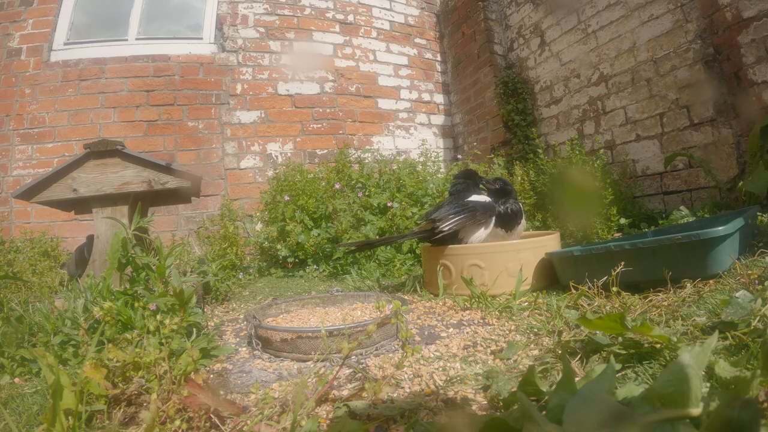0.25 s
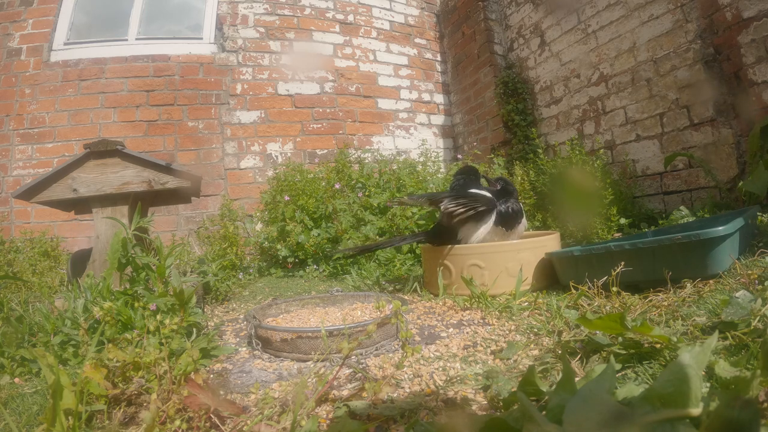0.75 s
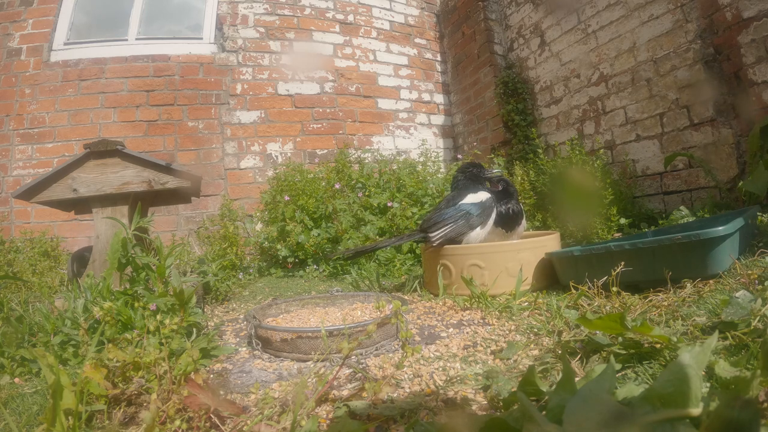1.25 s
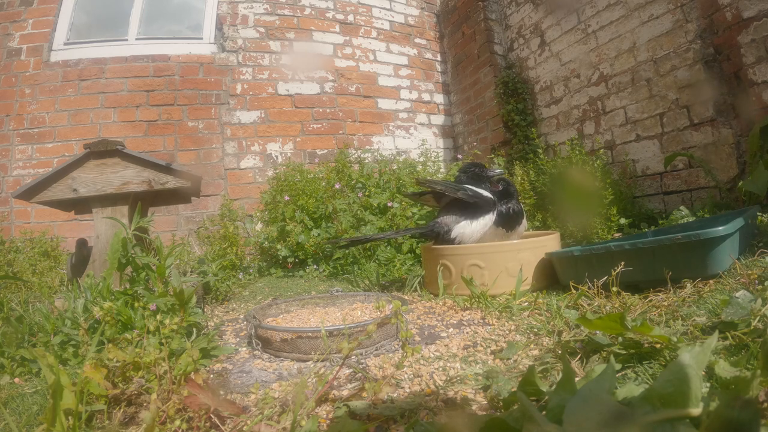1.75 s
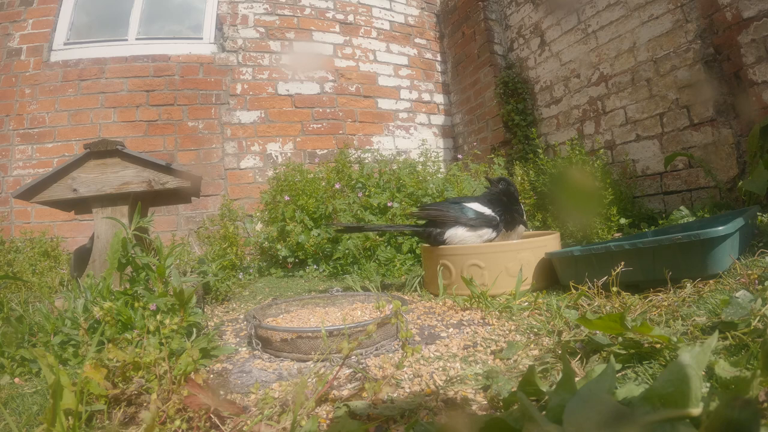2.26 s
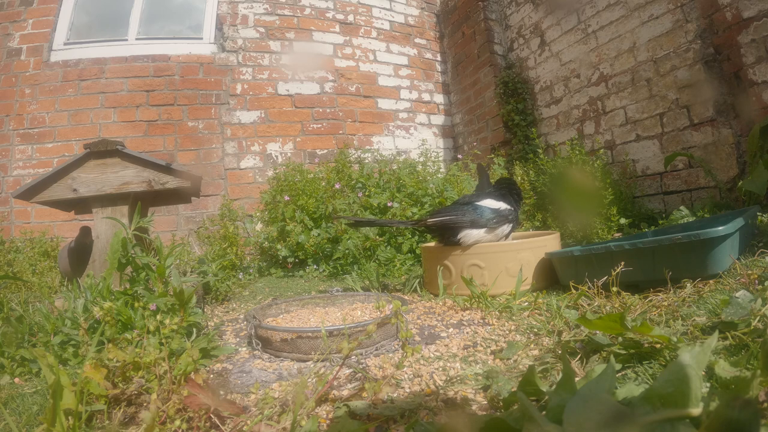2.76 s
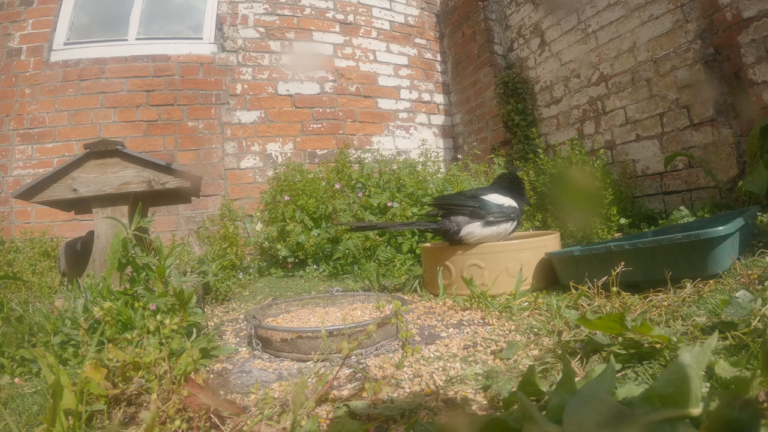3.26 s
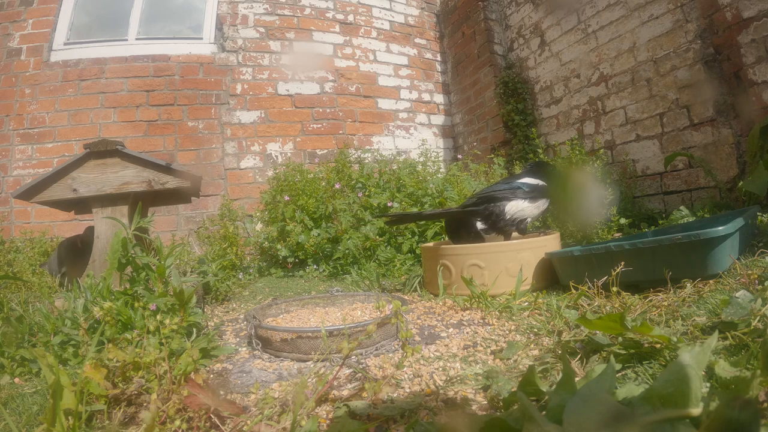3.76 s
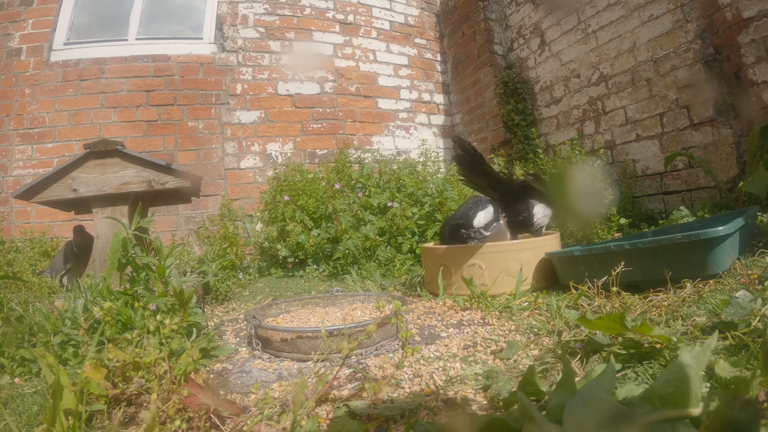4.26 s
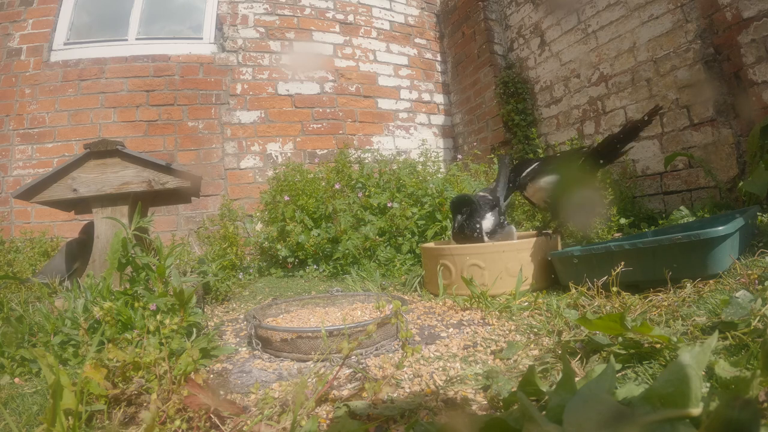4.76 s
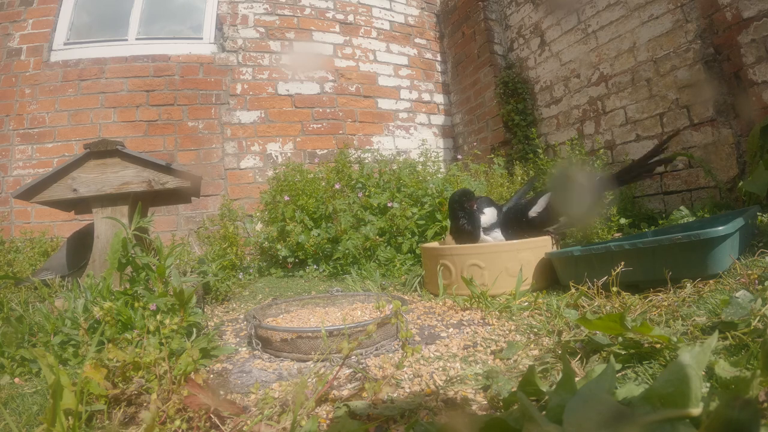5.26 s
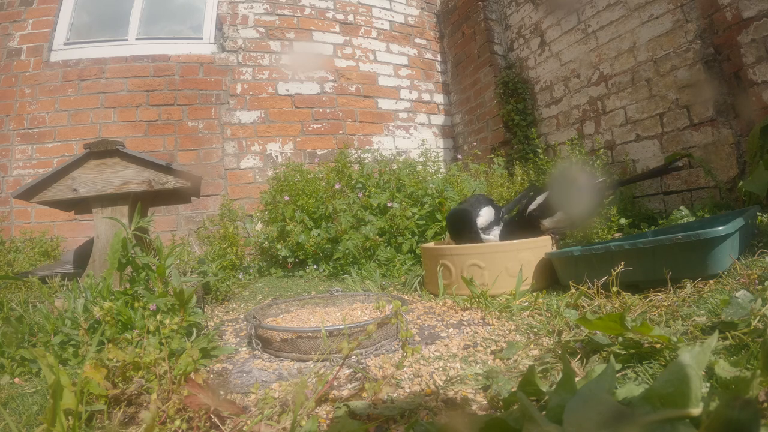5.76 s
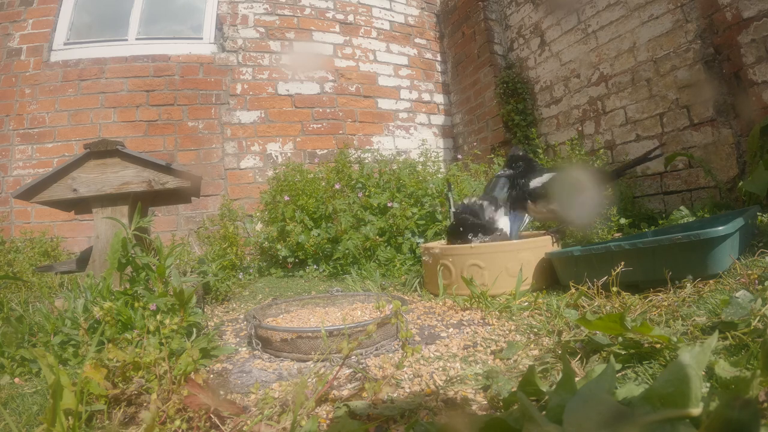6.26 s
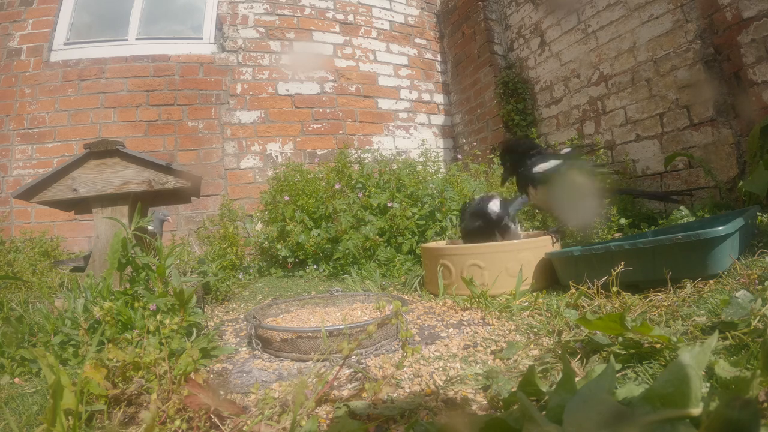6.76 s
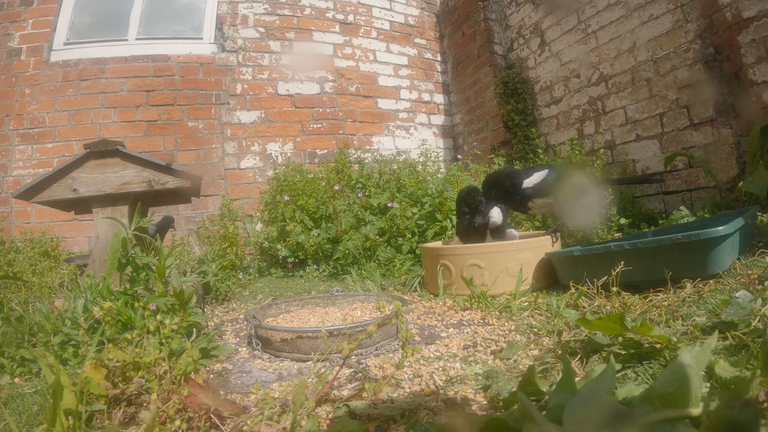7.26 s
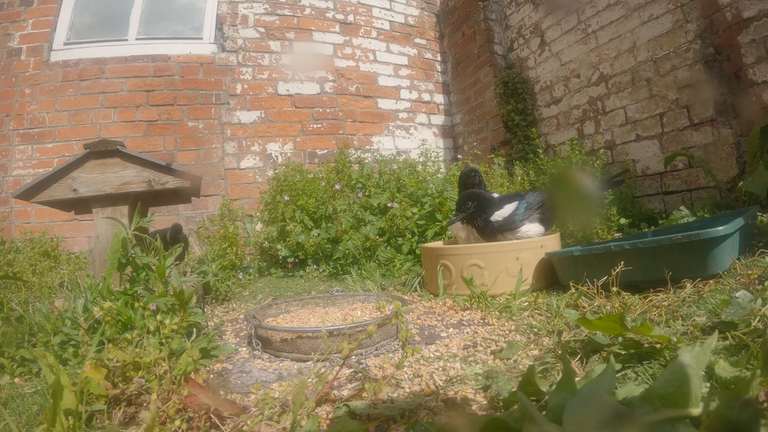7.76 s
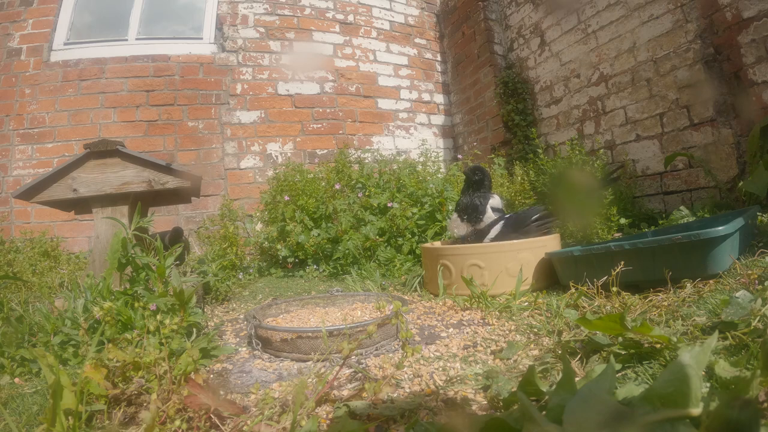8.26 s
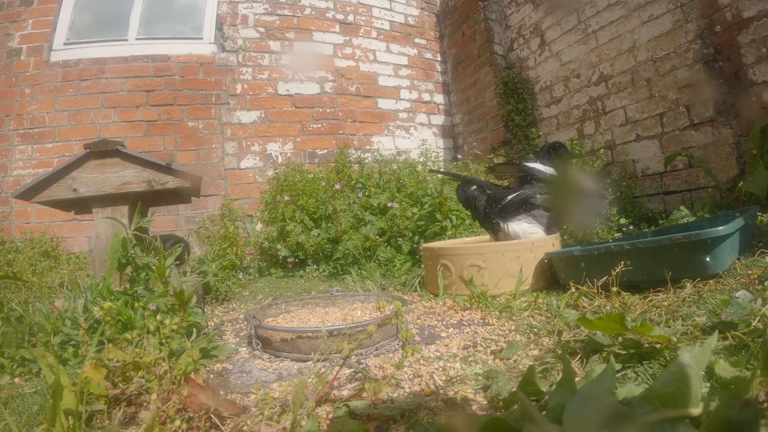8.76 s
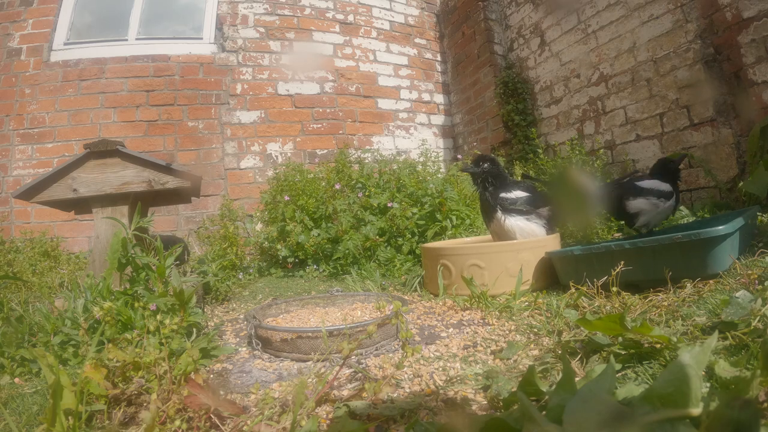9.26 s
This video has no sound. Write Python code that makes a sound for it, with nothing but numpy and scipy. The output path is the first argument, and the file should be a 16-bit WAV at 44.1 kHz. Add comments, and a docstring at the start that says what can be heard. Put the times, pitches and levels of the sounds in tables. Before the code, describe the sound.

Raspy chattering bird calls, bursts of wing-slapped water with gulps and drips, over a distant engine throb that fades and later swells in a walled garden.

```python
"""Young magpie bathing and begging

In a walled garden a young magpie bathes in a glazed dish and begs six times: trills of voiced beats.
Its wings slap the water: noise bursts and bubble showers make the spray and slosh, air pockets gulp
as rising tones, the dish rings in four modes and drops patter on the plants. Brick walls answer.
A far engine, a throb with blurred orders and roar, fades behind the house and swells again;
the garden hisses and one deep rumble comes and goes."""
import sys
import numpy as np
from scipy import signal
from scipy.fft import rfft, irfft, next_fast_len
from scipy.io import wavfile
from scipy.ndimage import uniform_filter1d, map_coordinates

SR = 44100
rng = np.random.default_rng(int(sys.argv[2]) if len(sys.argv) > 2 else 0)


def dump(signal):
    """Clip the signal to [-1, 1] and save it as 16-bit WAV at the path in sys.argv[1]."""
    limited = np.clip(np.atleast_2d(signal).T, -1, 1)
    pcm = np.round(limited * 32767).astype(np.int16)
    wavfile.write(sys.argv[1], SR, pcm)


N = 419832
TOP_HZ = 15800  # upper band limit at the microphone


def amp(db):
    """Decibels to gain."""
    return 10 ** (np.asarray(db) / 20)


def unit(x):
    """x at rms 1."""
    return x / np.sqrt(np.mean(x ** 2) + 1e-20)


def along(points, hz):
    """Read (Hz, value) points on a log frequency axis."""
    f, v = np.transpose(points)
    return np.interp(np.log(hz + 1), np.log(f + 1), v)


def curves(rows, t):
    """Each column after the time, at times t."""
    s, *cols = np.transpose(rows)
    return [np.interp(t, s, c) for c in cols]


def wobble(rate, size=N):
    """A smooth random curve, rate knots a second."""
    knots = rng.standard_normal(int(size * rate / SR) + 4)
    return map_coordinates(knots, [np.arange(size) * rate / SR])


def add(track, s, x):
    """Mix x into track from time s."""
    i = max(0, round(s * SR))
    track[i:i + len(x)] += x[:max(0, len(track) - i)]


def filtered(x, response):
    """x times a complex response of frequency."""
    n = x.shape[-1]
    m = next_fast_len(n + SR // 4)
    return irfft(rfft(x, m) * response(np.fft.rfftfreq(m, 1 / SR)), m)[..., :n]


def coloured(x, spectrum, size=1024):
    """Causal minimum-phase filter of energy 1 with the shape of the spectrum."""
    cepstrum = irfft(np.log(amp(along(spectrum, np.fft.rfftfreq(size, 1 / SR)))))
    cepstrum[1:size // 2] *= 2  # folding the cepstrum makes it causal
    cepstrum[size // 2 + 1:] = 0
    pulse = irfft(np.exp(rfft(cepstrum)))
    return signal.fftconvolve(x, pulse / np.linalg.norm(pulse))[:N]


# How alike diffuse sound is at the left and right microphones.
# Each row: frequency in Hz, left-right correlation (1 = identical).
STEREO_LIKENESS = [(100, 0.99), (490, 0.87), (1500, 0.06), (6000, 0.96), (12000, 0.51)]


def diffuse(gain, size=N):
    """Stereo noise of rms 1 arriving from all around."""
    turn = lambda hz: np.arccos(np.clip(along(STEREO_LIKENESS, hz), -1, 1)) / 2
    shares = lambda hz: np.array([np.cos(turn(hz)), np.sin(turn(hz))])
    mid, side = filtered(rng.standard_normal((2, size)), lambda hz: gain(hz) * shares(hz))
    return unit(np.array([mid + side, mid - side]))


# The six begging calls from the dish.
# Each row: first beat in seconds, last beat in seconds, beats between, open beak's resonance in Hz,
# its height in dB, low rattle in dB relative to the voice, extra level sent to the walls in dB.
BEGGING_CALLS = [(0.01, 0.267, 10, 5300, 0, -26.5, -1.5), (0.488, 1.318, 32, 5000, 1.5, -33, 1.5),
                 (1.706, 1.945, 9, 5940, 2.5, -18, 2.5), (2.46, 3.399, 35, 6980, 4.5, -11.5, 6.5),
                 (5.248, 5.598, 14, 5700, 7, -30, 3.5), (7.631, 7.969, 13, 5450, -2, -16.5, 5)]
# The course of each call, one list a call, before the closing slur.
# Each row: time in seconds, crest pitch in Hz, trough pitch in Hz, voiced share of a beat, level in dB.
CALL_COURSES = [
    [(.01, 2850, 1957, 0.73, -34.5), (.11, 2876, 2620, 0.53, -34.5), (.215, 2880, 2400, 0.68, -35),
     (.248, 2210, 2114, 1, -32), (.275, 1850, 1760, 0.48, -41.5)],
    [(.49, 3216, 2873, 0.94, -51), (.685, 3086, 2540, 0.54, -40.5), (.735, 3050, 2080, 0.7, -35),
     (.82, 2720, 1660, 0.54, -37.5), (.88, 2236, 1730, 1, -37.5), (.92, 2623, 1830, 0.54, -43),
     (1.07, 2920, 2507, 0.47, -41.5), (1.27, 2780, 2415, 0.62, -39), (1.32, 2144, 2010, 0.84, -38.5)],
    [(1.708, 2746, 2196, 0.38, -53), (1.785, 2735, 1890, 0.51, -40), (1.945, 2067, 1608, 0.95, -40.5)],
    [(2.46, 3010, 2566, 0.47, -47.5), (2.62, 2823, 1920, 0.47, -41), (2.76, 2220, 1820, 0.87, -38.5),
     (2.9, 2770, 2136, 0.85, -41.5), (3.03, 2916, 2450, 0.62, -43), (3.08, 2940, 1898, 0.85, -40.5),
     (3.35, 2887, 1877, 0.95, -40), (3.405, 2670, 1750, 0.68, -38)],
    [(5.249, 3270, 3250, 0.56, -32), (5.32, 3043, 2200, 0.46, -26), (5.39, 2997, 1868, 0.84, -24.5),
     (5.56, 2850, 1514, 0.99, -27.5), (5.612, 1975, 1462, 1, -32)],
    [(7.633, 2854, 2330, 0.53, -43.5), (7.74, 2616, 1750, 0.64, -41.5), (7.81, 1892, 1395, 0.58, -47),
     (7.92, 2500, 1640, 0.65, -40.5), (7.97, 2216, 1716, 0.54, -39.5)],
]


def magpie(lead_s=0.0089):
    """All the begging calls, as they reach the microphones and as they reach the walls."""
    direct, sent = np.zeros((2, N))
    for call_row, course in zip(BEGGING_CALLS, CALL_COURSES):
        first, last, count, gape_hz, gape_db, rattle_db, sent_db = call_row
        t = np.arange(first - lead_s, last + SLUR_S, 1 / SR)
        call = begging(t, trill(t, first, last, count, course), gape_hz, gape_db, rattle_db)
        add(direct, t[0], call)
        add(sent, t[0], amp(sent_db) * call)
    return direct, sent


# The trill's extra speed at first, its settling time, and how its pace follows pitch.
HURRY, SETTLE_S, PACE_POWER = .1, 0.174, 0.115
# The closing slur: length, fall, how late it falls, loss of level by its end.
SLUR_S, SLUR_OCTAVES, SLUR_BEND, SLUR_FADE_DB = .062, 1.5, 1.7, 10


def trill(t, first, last, count, course):
    """Beats start fast, settle and drag at low pitch; the last is drawn out into a falling slur."""
    crest_hz, trough_hz, voiced, level_db = curves(course, t)
    pace = (1 + HURRY * np.exp((first - t) / SETTLE_S)) * crest_hz ** PACE_POWER
    beats = np.cumsum(pace)
    start, end = np.interp([first, last], t, beats)
    count = round(count)
    beats = count * (beats - start) / (end - start)
    beats = np.where(t < last, beats, count + .5 * np.tanh(2 * (beats - count)))
    slur = np.clip((t - last) / SLUR_S, 0, 1) ** SLUR_BEND
    sink = 2 ** (-SLUR_OCTAVES * slur)
    return beats, crest_hz * sink, trough_hz * sink, voiced, level_db - SLUR_FADE_DB * slur


# Throat and open beak as a resonant tract. Each row: frequency in Hz, relative gain in dB.
BEAK_GAIN = [(700, -7), (1500, 2.5), (2400, -12.5), (3000, 0.5), (4000, 3), (5700, 12.5), (7300, 9.5),
             (8800, -8.5), (10000, -11.5), (11000, -43.5), (15000, -39)]
# Low rattle of the voice. Each row: frequency in Hz, relative level in dB per Hz.
RATTLE_SPECTRUM = [(1100, -23), (1490, 0), (2150, 0.5), (3000, -31.5)]


def begging(t, controls, gape_hz, gape_db, rattle_db, gape_width_hz=1100, jitter=0.024, uneven=0.012,
            slack_db=-24, rasp_db=-19, split_db=-1, thinning_db=-10, fall=0.14, climb=.25, knee=2.6,
            lead=0.089, whistle_hz=2980, whistle_db=-25):
    """One call: at each beat the voice opens, dips in pitch, climbs to a flat crest and shuts."""
    beats, crest_hz, trough_hz, voiced, level_db = controls
    around = lambda centre: (beats - centre + .5) % 1 - .5  # beats from the nearest such moment
    dip_width = np.where(around(0) < 0, fall, climb)
    dip = np.exp(-np.abs(around(0) / dip_width) ** knee)
    strain = dip * np.abs(1 - trough_hz / crest_hz)  # the deeper the dip, the hoarser
    slack = np.exp((t - t[-1]) / 0.017)  # the voice frays and loses its overtones at the end

    pitch = crest_hz + (trough_hz - crest_hz) * dip * (1 + .17 * wobble(40, len(t)))
    fraying = jitter * (.5 + dip + 6 * slack) * wobble(1500, len(t))
    pitch = pitch * (1 + uneven * wobble(45, len(t)) + fraying)
    phase = 2 * np.pi * np.cumsum(pitch) / SR

    def tract_db(hz):
        return along(BEAK_GAIN, hz) + gape_db * np.exp(-((hz - gape_hz) / gape_width_hz) ** 2)

    def partial(k):
        gain = amp(tract_db(k * pitch) + slack_db * slack * np.log2(k))
        return gain * np.sin(k * phase) * (k * pitch < TOP_HZ)

    # partials halfway between the harmonics
    split = amp(split_db) * strain * sum(partial(k + .5) * wobble(300, len(t)) for k in range(2, 5))
    lowest = amp(thinning_db * dip) * partial(0.98)
    voice = unit(lowest + sum(partial(k) for k in range(2, 10)) + split)
    noise = lambda db: unit(filtered(rng.standard_normal(len(t)), lambda hz: amp(db(hz))))
    rattle = amp(rattle_db) * noise(lambda hz: along(RATTLE_SPECTRUM, hz))
    voice = voice + np.sqrt(dip) * (rattle + amp(rasp_db) * noise(tract_db))
    opening = np.exp(-(2 * around(voiced / 2 - lead) / voiced) ** 4)
    voice = voice * opening * amp(2 * wobble(60, len(t)))
    # evened over about a beat, so the course sets the level
    power = np.abs(uniform_filter1d(voice ** 2, size=1150))
    # a thin whistle lingers between beats when the crest is near whistle_hz
    whistle = np.exp(-((crest_hz - whistle_hz) / 130) ** 2 - (around(1 / 2) / climb) ** 2)
    whistle = whistle * np.sin(2 * np.pi * np.cumsum(crest_hz) / SR)
    fade = np.clip(np.minimum(t - t[0], t[-1] - t) / 0.0018, 0, 1)
    return (voice / np.sqrt(power + 1e-9) + amp(whistle_db) * whistle) * fade * amp(level_db)


# Wing strokes in the water; the gulps follow them too.
# Each row: time in seconds, spray in dB, slosh in dB, both before colouring.
WING_STROKES = [(4.092, -45, -65), (4.171, -48, -48), (4.235, -41, -48.5), (4.381, -44, -50),
                (4.453, -39.5, -51), (4.518, -38, -58), (4.587, -40, -40.5), (4.659, -37.5, -42.5),
                (4.743, -36, -41.5), (4.917, -41, -55.5), (6.092, -49.5, -42.5), (6.17, -38.5, -43),
                (6.249, -43, -48.5), (6.312, -39.5, -52), (6.406, -36.5, -45), (6.6, -38.5, -48),
                (6.69, -44, -52), (6.749, -38, -51.5), (6.828, -36.5, -47), (6.903, -41, -40.5),
                (6.982, -42, -53.5), (7.033, -40, -46), (7.518, -43, -53), (7.611, -44, -56),
                (8.326, -41.5, -38.5), (8.46, -39.5, -40), (8.531, -33, -46), (8.597, -34.5, -45),
                (8.668, -35.5, -42.5), (8.74, -39, -51.5), (8.841, -37.5, -34.5), (9.374, -45, -43.5),
                (9.454, -43, -41.5)]
# Heavy drops smacking the water. Each row: time in seconds, relative level in dB.
DROP_SMACKS = [(4.174, -12.5), (4.385, -9.5), (4.545, -12.5), (4.5923, -8.5), (4.6592, -18), (4.747, -11),
               (4.805, -12), (6.317, -14.5), (6.6014, -22), (6.9036, -4.5), (7.5616, -9.5), (8.4637, -12.5),
               (8.61, -5), (8.751, -20), (9.377, -18), (9.459, -20)]
# Colour of the fine spray. Each row: frequency in Hz, relative level in dB per Hz.
SPRAY_SPECTRUM = [(1500, -29.5), (4000, -15), (5600, -6), (7200, -4), (8500, -14.5), (12300, -22.5),
                  (15500, -47)]
# Colour of the heavier slosh. Each row: frequency in Hz, relative level in dB per Hz.
SLOSH_SPECTRUM = [(250, 2.5), (550, -12.5), (1100, -8.5), (2500, -10.5), (7000, -25)]


def splashes(swell_s=0.0004, slap_s=0.0091, spray_s=0.022, slosh_s=0.012, fall_s=0.1,
             smack_db=-3.0, crack_db=19, thud_db=22, ticks_db=-15, laps_db=-18):
    """Strokes slap the surface, throw fine spray and churn larger bubbles; the drops fall back."""
    cracks, thuds, spray, slosh, thrown = np.zeros((5, N))
    t = np.arange(SR // 2) / SR
    swell = 1 - np.exp(-t / swell_s)
    for s, spray_db, slosh_db in WING_STROKES:
        slap = swell * np.exp(-t / slap_s) * rng.standard_normal(len(t))
        slap = slap / np.linalg.norm(slap)
        add(cracks, s, amp(spray_db + crack_db) * slap)
        add(thuds, s, amp(slosh_db + thud_db) * slap)
        add(spray, s, amp(spray_db) * swell * np.exp(-t / spray_s))
        add(slosh, s, amp(slosh_db) * swell * np.exp(-t / slosh_s))
        add(thrown, s, amp(spray_db) ** 2 * np.exp(-t / fall_s))  # power of drops still in the air
    for s, db in DROP_SMACKS:
        add(cracks, s, amp(db + smack_db) * smack(t))
    fizz = grains(rate=2000, hz=5800, spread=.5, cycles=2, scatter_db=6, size=128)
    churn = grains(rate=1800, hz=1750, spread=.6, cycles=2.6, scatter_db=4, size=280)
    ticks = grains(rate=1600, hz=5400, spread=.45, cycles=2, scatter_db=7, size=100)
    thrown = thrown * amp(10 * wobble(20))  # they land in clumps
    landing = np.sqrt(thrown)
    fine = cracks + spray * fizz + amp(ticks_db) * landing * ticks
    coarse = thuds + slosh * churn + amp(laps_db) * landing * churn
    return coloured(fine, SPRAY_SPECTRUM) + coloured(coarse, SLOSH_SPECTRUM)


def smack(t, smack_hz=6200, ring_s=0.0013, click=1.0):
    """A heavy drop: a click and a very short ring."""
    ring_hz = smack_hz * (1 + .1 * rng.standard_normal())
    ring = np.exp(-t / ring_s) * np.sin(2 * np.pi * ring_hz * t)
    return ring / np.linalg.norm(ring) + click * (t == 0)


def grains(rate, hz, spread, cycles, scatter_db, size):
    """A shower of tiny damped bubbles at rms 1, rate a second, each rising a little in pitch."""
    u = rng.random((int(rate * N / SR), 2))
    pitch = np.minimum(hz * np.exp(spread * rng.standard_normal((len(u), 1))), TOP_HZ)
    age = pitch * np.arange(size) / SR / cycles  # in decay times
    strength = amp(scatter_db * np.minimum(-np.log(u[:, 1:]), np.pi))
    rise = 1 + 0.045 * np.minimum(age, np.pi)
    rings = strength * (np.exp(-age) - np.exp(-6 * age)) * np.sin(2 * np.pi * cycles * age * rise)
    at = (u[:, :1] * N).astype(int) + np.arange(size)
    return unit(np.bincount(at.ravel(), rings.ravel(), N)[:N])


# Air pockets closing under the surface.
# Each row: time in seconds, starting pitch in Hz, level in dB before its swell, life in seconds.
AIR_POCKETS = [(.231, 546, -32, 0.034), (4.521, 810, -18, 0.0087), (4.804, 920, -19.5, 0.027),
               (4.922, 946, -27.5, 0.022), (6.098, 1104, -20, 0.023), (6.133, 803, -28, 0.037),
               (6.172, 3190, -15.5, 0.0066), (6.312, 910, -17, 0.0053), (6.603, 1000, -18, 0.0043),
               (7.03, 1320, -27.5, 0.0096), (7.128, 1780, -39, 0.023), (7.523, 2030, -36.5, 0.068),
               (7.592, 1390, -28, 0.017), (8.327, 1377, -20.5, 0.018), (8.463, 1320, -19, 0.0065),
               (8.646, 1010, -24, 0.016), (8.66, 892, -18.5, 0.053), (8.717, 1280, -28.5, 0.011),
               (8.739, 524, -35.5, 0.05), (9.265, 372, -28, 0.013)]
# The bubbles that a pocket sheds: level relative to it, mean delay, pitch scatter in octaves.
SHED_DB, SHED_DELAY_S, SHED_SPREAD = -10, 0.02, 0.248


def gulps(count=3, plop_hz=1500, plop_octaves=.55, plop_life_s=0.016, plop_delay_s=.03, plop_db=8):
    """Air pockets ring and shed short-lived bubbles; each wing stroke leaves a few plops of its own."""
    out = np.zeros(N)
    for s, hz, db, life in AIR_POCKETS:
        add(out, s, amp(db) * bubble(hz, life))
        for _ in range(count):
            delay = rng.exponential(SHED_DELAY_S)
            shed_hz = hz * 2 ** (SHED_SPREAD * rng.standard_normal())
            add(out, s + delay, amp(db + SHED_DB) * bubble(shed_hz, life / 2))
    for s, _, slosh_db in WING_STROKES:
        for size in 2 ** (plop_octaves * rng.standard_normal(count)):  # big ones ring lower and longer
            plop = bubble(plop_hz / size, plop_life_s * size)
            add(out, s + rng.exponential(plop_delay_s), amp(slosh_db + plop_db) * plop)
    return out


GULP_RISE_OCTAVES = 0.27  # over a pocket's life


def bubble(hz, life):
    """A trapped air pocket swells, rings and rises in pitch as it nears the surface."""
    t = np.arange(SR // 10) / SR
    rise = 2 ** (GULP_RISE_OCTAVES * np.minimum(t / life, 2))
    pitch = hz * rise * (1 + 0.032 * wobble(550, len(t)))
    swell = (1 - np.exp(-t / .0015)) * np.exp(-(2 * t / life) ** 1.3)
    return swell * np.sin(2 * np.pi * np.cumsum(pitch) / SR)


# Ringing modes of the glazed dish.
# Each row: frequency in Hz, relative level in dB, time to fall 60 dB in seconds.
DISH_MODES = [(772.5, 4, 0.23), (1137, 4.5, 0.28), (1716, -4.5, 0.4), (2050, -3, 0.14)]


def dish(water):
    """The dish rings faintly with whatever stirs in it."""
    t = np.arange(SR // 2) / SR
    ring = sum(amp(db - 60 * t / t60) * np.sin(2 * np.pi * hz * t) for hz, db, t60 in DISH_MODES)
    return amp(-26.5) * signal.fftconvolve(water, ring / np.linalg.norm(ring))[:N]


def walls(x, t60=0.31, wet_db=-14):
    """Brick walls a few steps away return a short diffuse tail."""
    t = np.arange(SR // 2) / SR
    tail = diffuse(np.ones_like, len(t)) * amp(-60 * t / t60) * (1 - np.exp(-t / 0.00056))
    return amp(wet_db) * signal.fftconvolve(x[None], tail / np.linalg.norm(tail[0]), axes=1)[:, :N]


# The far engine's course. Each row: time in seconds, throb in dB, roar in dB before roar_gain_db.
ENGINE_COURSE = [(0.0, -34, -41.5), (0.38, -35.5, -42.5), (1.0, -28.5, -42.5), (2.2, -35, -41.5),
                 (3.9, -48.5, -46), (7.9, -63.5, -58), (8.8, -46, -51.5), (9.52, -45.5, -51.5)]
# The engine's blurred upper orders. Each row: centre in Hz, width in Hz, relative level in dB.
UPPER_ORDERS = [(104.95, 13.3, 2), (173.6, 17, -13.5)]
# The engine's roar. Each row: frequency in Hz, relative level in dB per Hz.
ROAR_SPECTRUM = [(22, 6.5), (70, -6.5), (200, -1), (350, -12.5), (950, -19.5), (1700, -29), (4000, -45),
                 (10000, -99)]


def engine(throb_hz=55.9, orders_db=-1.5, roar_gain_db=6.0, dull_hz=420, dulling=0.48):
    """A far engine's throb, blurred orders and roar, which dulls as it recedes."""
    t = np.arange(N) / SR
    throb_db, roar_db = curves(ENGINE_COURSE, t)
    throb = unit(np.sin(2 * np.pi * throb_hz * t + wobble(4)) * amp(2.4 * wobble(6.1)))
    orders = diffuse(lambda hz: sum(amp(db) / np.sqrt(width) / (1 + (2 * (hz - centre) / width) ** 2)
                                    for centre, width, db in UPPER_ORDERS))
    roar = diffuse(lambda hz: amp(along(ROAR_SPECTRUM, hz)))
    top = filtered(roar, lambda hz: 1 - 1 / (1 + (hz / dull_hz) ** 4))
    roar = roar + top * (amp(dulling * (roar_db - roar_db.max()) + 2) - 1)
    orders = amp((throb_db + roar_db) / 2 + orders_db) * orders
    return amp(throb_db) * throb + orders + amp(roar_db + roar_gain_db) * roar


def rumble(peak_s=2.79, hz=42, width_hz=8, db=-31, rise_s=.1, fall_s=0.46):
    """A deep rumble swells once and dies away: a narrow band of diffuse noise."""
    age = np.arange(N) / SR - peak_s
    swell = np.exp(np.minimum(age / rise_s, -age / fall_s))
    return amp(db) * swell * diffuse(lambda f: np.exp(-((f - hz) / width_hz) ** 2))


# Hiss of the garden air. Each row: frequency in Hz, relative level in dB per Hz.
HISS_SPECTRUM = [(900, -29), (3200, -8.5), (6500, 2), (8000, -6), (10500, -18), (14000, -65)]


def garden_hiss(hiss_db=-70):
    """Steady diffuse noise from all around the garden."""
    return amp(hiss_db) * diffuse(lambda hz: amp(along(HISS_SPECTRUM, hz)))


# Phase of sound from the dish at the two microphones.
# Each row: frequency in Hz, lead of the left in radians.
LEFT_LEAD = [(700, -0.45), (3500, -1.6), (4500, -0.18)]
# Balance of sound from the dish. Each row: frequency in Hz, left minus right in dB.
LEFT_LEAN = [(1000, 0), (5500, -3.5), (11000, 5)]


def scene():
    """Bird and water near the centre of the walled garden."""
    water = splashes() + gulps()
    water = water + dish(water)
    calls, calls_to_walls = magpie()

    def ports(hz):  # left and right microphone share the lead and lean equally
        turn = np.exp(.5j * along(LEFT_LEAD, hz) * np.array([[1], [-1]]))
        return turn * amp(along(LEFT_LEAN, hz) * np.array([[.5], [-.5]]))

    near = filtered(water + calls, ports) + walls(water + calls_to_walls)
    return near + engine() + rumble() + garden_hiss()


def record(dry):
    """The microphone keeps nothing above its band limit."""
    return filtered(dry, lambda hz: hz < TOP_HZ)


dry = scene()
out = record(dry)
dump(out)
```